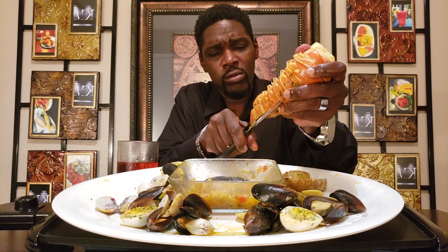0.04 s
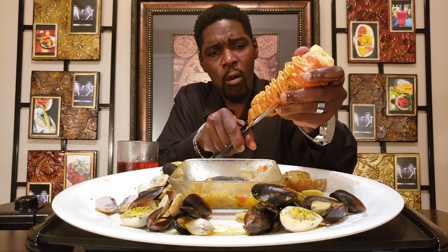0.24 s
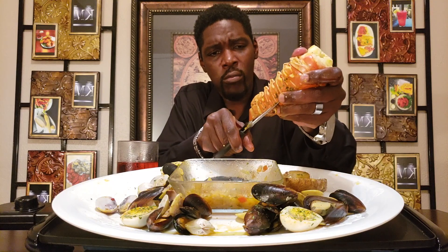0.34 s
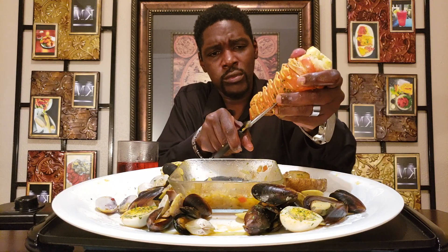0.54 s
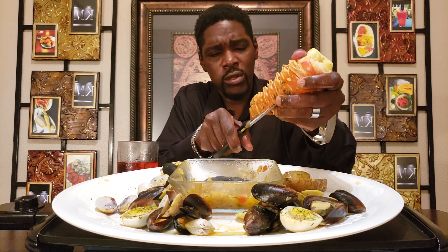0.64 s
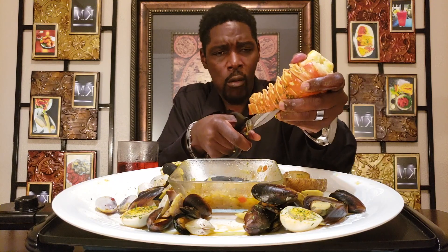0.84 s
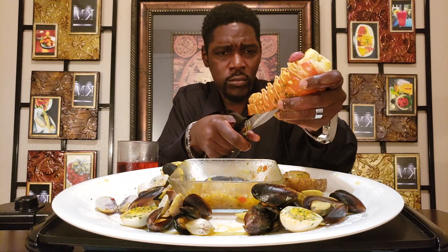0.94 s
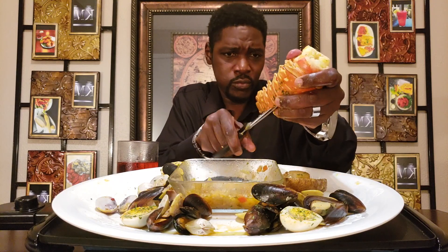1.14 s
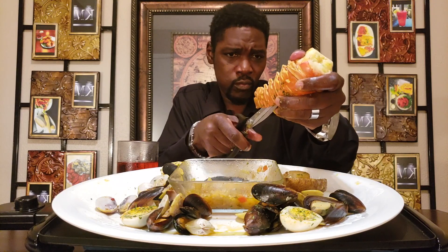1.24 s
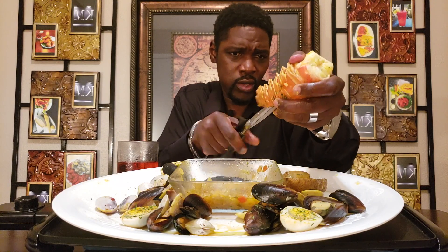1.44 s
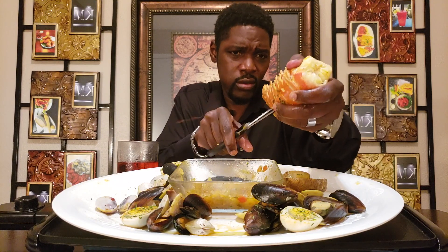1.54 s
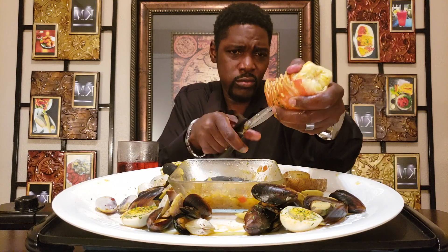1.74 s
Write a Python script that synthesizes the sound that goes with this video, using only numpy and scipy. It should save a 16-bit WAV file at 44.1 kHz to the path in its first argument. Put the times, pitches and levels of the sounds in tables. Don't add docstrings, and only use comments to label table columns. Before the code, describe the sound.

Kitchen shears crunch through a hard seafood shell with sharp irregular cracks in a small dining room

```python
import sys
import numpy as np
from scipy import signal
from scipy.io import wavfile
from scipy.ndimage import uniform_filter1d

SR = 44100
rng = np.random.default_rng(int(sys.argv[2]) if len(sys.argv) > 2 else 0)


def gain_from_db(level_db):
    decades = np.asarray(level_db, float) / 20
    return 10 ** decades


def wrap_up_sound(samples):
    columns = np.atleast_2d(samples).T
    tamed = np.clip(columns, -1, 1)
    steps = np.round(tamed * 32767).astype(np.int16)
    wavfile.write(sys.argv[1], SR, steps)


N = 79380
LEAD = 4410


def read(points, hz):
    point_hz, value = np.transpose(points)
    return np.interp(np.log(hz + 1), np.log(point_hz + 1), value)


def evened(x):
    return x / np.sqrt(np.mean(x ** 2) + 1e-20)


def add(mix, s, sound):
    part = mix[LEAD + round(s * SR):][:len(sound)]
    part += sound[:len(part)]


def resonate(x, hz, width_hz):
    turn = np.exp(2j * np.pi * hz * np.arange(len(x)) / SR)
    r = np.exp(-np.pi * width_hz / SR)
    smooth = signal.lfilter([1 - r], [1, -r], x / turn)
    return 2 * (turn * smooth).real


def fade(t60_ms, rise_ms):
    t = np.arange(SR // 20) / SR
    rise = (1 - np.exp(-1000 * t / rise_ms)) ** 2
    shape = rise * gain_from_db(-60000 * t / t60_ms)
    return t, shape / shape.max()


# (time [s], peak level [dB], t60 [ms])
SHELL_CRACKS = [(-.048, -12, 6), (.1597, -42, 8), (.1655, -50, 8), (.2168, -30, 6), (.3078, -32, 9),
                (.3516, -26, 14), (.354, -20, 25), (.3578, -15, 14), (.3603, -13, 8), (.3612, -7, 9),
                (.3638, -12, 8), (.532, -41, 6), (.6477, -26, 6), (.684, -35, 6), (.7533, -33, 5),
                (.7601, -32, 8), (.7791, -32, 5), (.883, -47, 12), (.9088, -36, 7), (1.0053, -22, 6),
                (1.0725, -11, 4), (1.077, -4, 2.5), (1.0803, -12, 7), (1.0975, -22, 3), (1.4548, -53, 5),
                (1.4598, -51, 5), (1.4748, -33, 5), (1.5143, -39, 5), (1.5179, -34, 6), (1.5417, -15, 7),
                (1.7036, -41, 3.9),
    (1.217, -38, 4),
    (1.497, -43, 5),
    (1.5757, -30, 4),
    (1.5535, -30, 5),
]
# (frequency [Hz], width
# [Hz], level [dB])
CRACK_MODES = [(3980, 2190, 1), (7400, 2760, 10.5), (10400, 1900, 4.5), (13300, 2500, -1),
               (2300, 1400, -4.5)]
CRACK_DB, FAR_CRACK_DB = 5, 3


def crack(s, db, t60_ms):
    t, shape = fade(t60_ms, rise_ms=0.048)
    snap = 4 * (t == 0)
    burst = shape * rng.standard_normal(len(t)) + snap
    out = 0
    for hz, width_hz, mode_db in CRACK_MODES:
        narrow = resonate(burst, hz, width_hz)
        out = out + gain_from_db(mode_db) * resonate(narrow, hz, 1.66 * width_hz)
    out = gain_from_db(db + CRACK_DB) * out / abs(out).max()
    far = gain_from_db(FAR_CRACK_DB) * np.linalg.norm(out) * np.array([1, -.6])
    return s, out, far


# (time [s], peak level [dB], pitch [Hz], t60 [ms])
SHELL_KNOCKS = [(-.05, -12.5, 800, 13), (-.045, -11.5, 2000, 7), (-.04, -21, 350, 30),
                (-.043, -14, 3800, 6), (.3517, -16, 3100, 10), (.352, -18, 1800, 9), (.3541, -2, 2500, 5),
                (.356, -9, 2200, 6), (.3585, -12, 2700, 8), (.3537, -11, 1350, 12), (.3562, -13, 1250, 12),
                (.3588, -15, 1400, 9), (.3612, -11, 3800, 8), (.3612, -7, 1300, 11), (.3625, -8, 1900, 8),
                (.3646, -10, 1200, 9), (.364, -13, 4400, 6), (.3625, -19, 670, 30), (.361, -20, 805, 26),
                (.6086, -21.5, 1200, 14), (.6105, -30, 800, 10), (.608, -32, 2500, 5),
                (1.0725, -15, 2500, 5), (1.0769, -10, 2400, 5), (1.0803, -20, 2800, 6),
                (1.0725, -19, 3800, 4), (1.0777, -16, 1650, 24), (1.0735, -23, 1600, 13),
                (1.5372, -28, 1700, 20), (1.5422, -17, 3300, 7), (1.5424, -14, 1500, 9),
                (1.5445, -29, 950, 12), (1.5412, -24, 2200, 5), (.2178, -28, 640, 22),
                (.1085, -28, 1900, 7), (1.0085, -32, 650, 14), (1.0053, -31, 3600, 3.5),
                (1.0056, -31, 2200, 4), (.217, -24, 1600, 6)]
RISE_MS, RING_SHARE, FAR_RING = 0.19, 0.74, 0.43
OVERTONE, OVERTONE_DB = 1.623, -17


def knock(s, db, hz, t60_ms, wet_db=0):
    rings = []
    for t60 in (RING_SHARE * t60_ms, RING_SHARE * FAR_RING * t60_ms):
        t, shape = fade(t60, RISE_MS)
        overtone = gain_from_db(OVERTONE_DB) * np.sin(2 * np.pi * OVERTONE * hz * t)
        rings.append(shape * (overtone - np.sin(2 * np.pi * hz * t)))
    near, far = rings
    same_energy = np.linalg.norm(near) / np.linalg.norm(far)
    return s, gain_from_db(db) * near, gain_from_db(db + wet_db) * far * same_energy


# (time [s], peak level [dB], pitch [Hz], t60 [ms])
SHELL_TAPS = [(.217, -10.5, 2550, 8), (.3081, -21, 2550, 6), (.308, -27, 3500, 5), (.3092, -34, 1200, 8),
              (.307, -34, 2400, 4), (.5945, -38, 1300, 8), (.6, -35, 1500, 8), (.6005, -40, 2600, 5),
              (.656, -39, 4300, 4), (.606, -31, 1400, 8), (.648, -26, 2570, 8), (.6485, -36, 1300, 7),
              (.6798, -34, 1700, 6), (.684, -27, 1500, 8), (.684, -28, 3800, 4), (.6993, -33, 1900, 9),
              (.7038, -35, 3300, 5), (.71, -30, 2800, 4), (.7535, -30, 2500, 3.5), (.7604, -37, 4400, 8),
              (.7791, -30, 2600, 5), (.7791, -36, 1000, 7), (.946, -51, 900, 8), (.9668, -47, 700, 8),
              (.9865, -50, 700, 8), (1.0462, -36, 800, 6), (1.2205, -35, 800, 10), (1.2385, -37, 800, 16),
              (1.3023, -42, 1200, 6), (1.311, -39, 1000, 30), (1.3153, -37, 1500, 14),
              (1.3172, -39, 750, 14), (1.3505, -39, 1400, 6), (1.428, -50, 1500, 6),
              (1.4702, -45, 1300, 10), (1.4748, -42, 1750, 10), (1.4972, -43, 1900, 10),
              (1.7035, -46, 1600, 6)]


def tap(*row):
    return knock(*row, wet_db=-7.5)


# (time [s], peak level [dB], pitch [Hz])
HAND_THUDS = [(0.106, -43, 70), (.2175, -39, 340), (0.362, -50, 250), (0.4434, -21, 240), (0.489, -50, 60),
              (.696, -31, 320), (0.7446, -33.5, 310), (0.9457, -50, 300), (0.9661, -42.5, 300),
              (1.0076, -22, 270), (1.05, -37.5, 150), (1.078, -68, 330), (1.1, -49.5, 70), (1.51, -51, 250),
              (1.543, -52, 170), (1.593, -49, 250), (1.78, -48, 220)]
THUD_CYCLES, THUD_OVERTONE_DB, THUD_WET_DB = 2.34, -6.5, -2.5


def thud(s, db, hz):
    t, shape = fade(1000 * THUD_CYCLES / hz, 120 / hz)
    overtone = gain_from_db(THUD_OVERTONE_DB) * np.sin(2 * np.pi * 2.21 * hz * t)
    push = -gain_from_db(db) * shape * (np.sin(2 * np.pi * hz * t) + overtone)
    return s, push, gain_from_db(THUD_WET_DB) * push


# (start time [s], length [s], level [dB], pitch [Hz])
SHELL_CREAKS = [
    (.617, .014, -53, 1300),
    (.655, .02, -63, 4300),
    (.762, .02, -54, 1300),
    (1.468, .065, -58, 1600),
    (1.012, .055, -58, 2000),
    (.224, .06, -58, 1500),
    (.78, .02, -62, 3500),
]
SLIPS_PER_S, CREAK_WIDTH_HZ = 3000, 900


def creak(s, length, db, hz):
    t = np.arange(SR // 10) / SR
    slips = rng.random(len(t)) < SLIPS_PER_S / SR
    size = rng.standard_normal(len(t))
    strain = np.sin(np.pi * np.clip(t / length, 0, 1)) ** .5
    narrow = resonate(slips * size * strain, hz, CREAK_WIDTH_HZ)
    out = gain_from_db(db) * evened(resonate(narrow, hz, CREAK_WIDTH_HZ))
    return s, out, out


# (frequency [Hz], level [dB], t60 [s])
TABLEWARE = [(671, -35, .2), (803, -37, .3), (1270, -38, .25), (1458, -36, .3), (1540, -37, .35),
             (1686, -36, .4), (1780, -37, .35), (2069, -36, .3), (2327, -36, .3), (2523, -38, .25)]
DISH_DB = -23


def dishes(x):
    t = np.arange(SR // 2) / SR
    ring = sum(gain_from_db(db - 60 * t / t60) * np.sin(2 * np.pi * hz * t) for hz, db, t60 in TABLEWARE)
    ring = ring * np.minimum(t / .008, 1)
    return gain_from_db(DISH_DB) * signal.fftconvolve(x, ring)[:len(x)]


# (frequency [Hz], t60 [s])
TAIL_T60 = [(120, 0.48), (300, 0.6), (660, 0.5), (1740, 0.43), (4590, 0.46), (9000, .39), (12100, .35),
            (15500, .27)]
# (frequency [Hz], level [dB])
TAIL_COLOUR = [(100, -1), (350, -6), (700, -2.5), (1600, -.5), (3000, 1), (5500, 0), (9000, 1),
               (15000, -9.5)]
TAIL_DB, TAIL_START_MS, TAIL_RISE_MS = -7.8, 2.3, 6.1


def tail():
    hz, t, z = signal.stft(rng.standard_normal(SR), SR, nperseg=256)
    decay_db = -60 * t / read(TAIL_T60, hz)[:, None]
    z = z * gain_from_db(read(TAIL_COLOUR, hz)[:, None] + decay_db)
    out = signal.istft(z, SR, nperseg=256)[1][:SR]
    ms = np.arange(SR) * 1000 / SR
    out = out * np.clip((ms - TAIL_START_MS) / TAIL_RISE_MS, 0, 1)
    return gain_from_db(TAIL_DB) * out / np.linalg.norm(out)


# (delay [ms], level [dB])
WALL_ECHOES = [(7.0, -17.5), (8.3, -17), (11.2, -14), (16, -22), (20.3, -18), (25, -24), (34, -19),
               (42, -23)]
WALL_LOW_HZ, WALL_HIGH_HZ = 400, 8000


def room(near, far):
    delay_ms, db = np.transpose(WALL_ECHOES)
    early = np.bincount((delay_ms * SR / 1000).astype(int), gain_from_db(db))
    wall = signal.butter(N=1, Wn=[WALL_LOW_HZ, WALL_HIGH_HZ], btype="band", fs=SR)
    early = signal.lfilter(*wall, np.pad(early, (0, 256)))
    tails = np.array([tail() for _ in far])
    echoes = signal.fftconvolve(near, early)[:len(near)]
    return echoes + signal.fftconvolve(far, tails, axes=1).sum(0)[:len(near)]


# (frequency [Hz], level [dB per Hz])
AIR_COLOUR = [(25, 2), (60, -1.5), (150, -4.5), (400, -10.5), (1500, -7.5), (5000, -19.5), (9000, -20.5),
              (16000, -31)]
AIR_DB, AIR_SWELL_DB = -60, 3.5


def air():
    hz = np.fft.rfftfreq(1024, 1 / SR)
    a, b, lumps = rng.standard_normal((N // 256 + 5, 513, 3)).T
    lumps = uniform_filter1d(lumps, size=8, axis=0)
    lumps = evened(uniform_filter1d(lumps, size=12, axis=1))
    z = (a + 1j * b) * gain_from_db(read(AIR_COLOUR, hz)[:, None] + AIR_SWELL_DB * lumps)
    return gain_from_db(AIR_DB) * evened(signal.istft(z, nperseg=1024, noverlap=768)[1][:N])


SPOTS = 5
MIC_DIP_HZ, MIC_DIP_WIDTH_HZ, MIC_DIP, MIC_LOW_HZ = 5500, 900, .4, 97


def scene():
    floor = air()
    near, far = np.zeros(N + LEAD), np.zeros((SPOTS, N + LEAD))
    sources = ((crack, SHELL_CRACKS), (knock, SHELL_KNOCKS), (tap, SHELL_TAPS),
               (thud, HAND_THUDS), (creak, SHELL_CREAKS))
    for source, rows in sources:
        for spot, row in enumerate(rows):
            s, direct, spread = source(*row)
            add(near, s, direct)
            add(far[spot % SPOTS], s, spread)
    near = near - MIC_DIP * resonate(near, MIC_DIP_HZ, MIC_DIP_WIDTH_HZ)
    heard = near + room(near, far) + dishes(near)
    low_cut = signal.butter(N=2, Wn=MIC_LOW_HZ, btype="high", fs=SR, output="sos")
    return (signal.sosfilt(low_cut, heard)[LEAD:] + floor)[None]


def low_pass(x):
    return signal.sosfilt(signal.butter(12, 16850, fs=SR, output="sos"), x)


def record(dry):
    edge = signal.firwin(255, 15900, fs=SR)
    shelf = signal.firwin(255, 16850, fs=SR)
    band = .95 * edge + .05 * shelf
    mix = np.clip(signal.oaconvolve(dry, band[None], "same"), -1, 1)
    return low_pass(mix)


dry = scene()
out = record(dry)
wrap_up_sound(out)
```